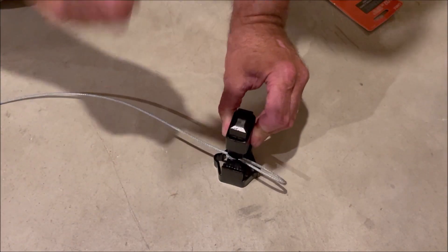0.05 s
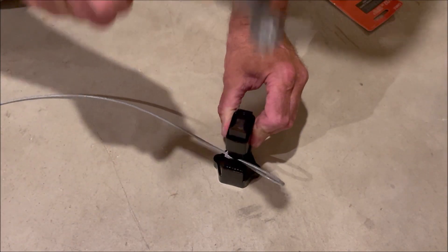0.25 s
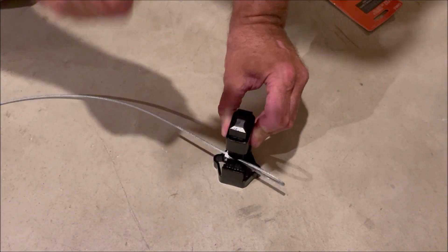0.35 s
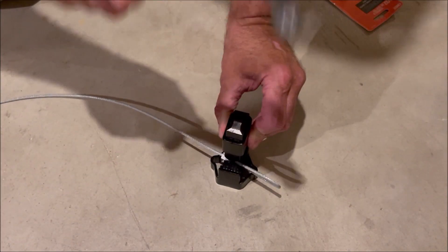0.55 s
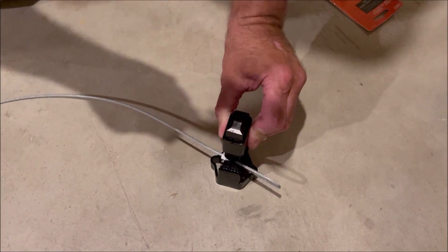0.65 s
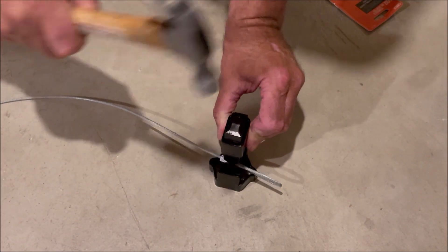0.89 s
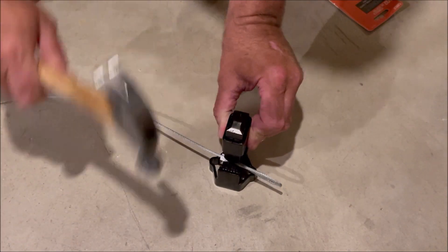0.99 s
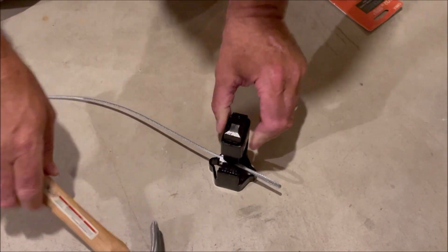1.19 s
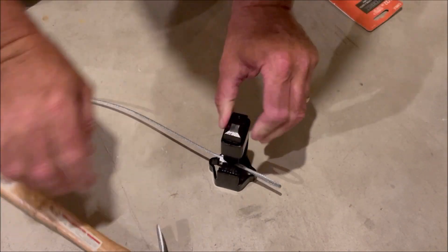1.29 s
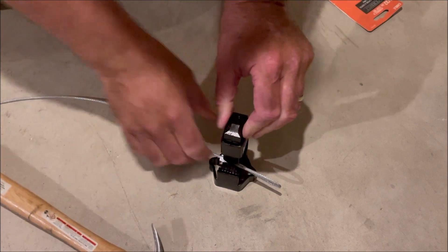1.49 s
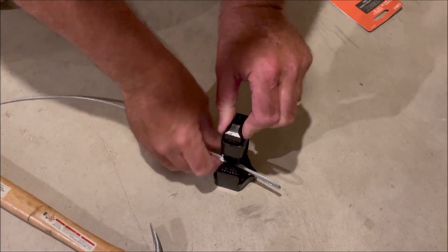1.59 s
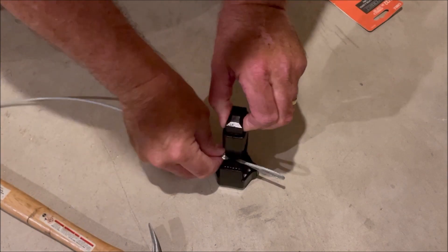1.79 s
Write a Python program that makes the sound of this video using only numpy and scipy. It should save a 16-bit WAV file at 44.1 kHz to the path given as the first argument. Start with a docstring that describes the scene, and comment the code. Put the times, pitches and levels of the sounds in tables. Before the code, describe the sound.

A steel hammer strikes a metal hand tool on concrete three times, then clatters down

```python
"""A bare room with a concrete floor: a steel hammer strikes a hand-held crimping tool three times, heard close.
Each blow is a noise crack, a short ring of tool modes and a sine thud that falls in pitch; the head sings on.
The hammer is then laid down: handle knocks and head clinks excite its modes as it rocks to rest.
Filtered noise gives the air, the rumble, the tail of an earlier blow and the room's reverb; a low hum swells between."""
import sys
import numpy as np
from scipy import signal
from scipy.fft import rfft, irfft, next_fast_len
from scipy.io import wavfile

SR = 44100
rng = np.random.default_rng(int(sys.argv[2]) if len(sys.argv) > 2 else 0)


def dump(signal):
    """Clip the signal to [-1, 1] and save it as 16-bit WAV at the path in sys.argv[1]."""
    limited = np.clip(np.atleast_2d(signal).T, -1, 1)
    pcm = np.round(limited * 32767).astype(np.int16)
    wavfile.write(sys.argv[1], SR, pcm)


N = 81585
T = np.arange(N) / SR


def from_db(db):
    """Decibels to gain."""
    return 10 ** (np.asarray(db) / 20)


def at_hz(points, hz):
    """Read a table on a log-frequency axis."""
    f, v = np.transpose(points)
    return np.interp(np.log(np.maximum(hz, 1)), np.log(f), v)


def add(out, s, x):
    """Mix x in from time s."""
    i = int(round(s * SR))
    x = x[max(-i, 0):N - i]
    out[max(i, 0):max(i, 0) + len(x)] += x


def colour(x, spectrum, tilt_db=0, keep_power=True):
    """Causal (minimum-phase) filter with the given spectrum, tilted about 3 kHz in dB per octave."""
    size = next_fast_len(N, True) * 2
    hz = np.maximum(np.fft.rfftfreq(size, 1 / SR), 1)
    octaves = np.log2(np.maximum(hz, 700) / 3000)  # the tilt levels off below 700 Hz
    gain = from_db(at_hz(spectrum, hz) + tilt_db * octaves)
    if keep_power:
        gain = gain / np.sqrt(np.mean(gain ** 2))
    # folding the cepstrum onto positive time gives minimum phase
    cepstrum = irfft(np.log(gain))[:size // 2]
    cepstrum[1:] *= 2
    return irfft(rfft(x, size) * np.exp(rfft(cepstrum, size)))[..., :N]


def dying(t60, hold=0):
    """Hold, then fall 60 dB in t60."""
    return from_db(-np.minimum(60 * np.maximum(T - hold, 0) / t60, 300))


def burst(length, t60):
    """A contact: dense random micro-impacts that hold briefly and die, evened out in spectrum."""
    size = 2048  # samples
    shape = dying(t60, length)[:size]
    x = rng.standard_normal(size) * shape
    for _ in range(2):
        flat = irfft(np.exp(1j * np.angle(rfft(x))))
        x = flat * np.sqrt(shape)
    energy_gain = np.sqrt(np.sum(shape ** 2) / np.sum(x ** 2))
    return np.pad(x * energy_gain, (0, N - size))


RING_FADE_IN_S = 0.00031  # short ramp that smooths the start of each ring


def ring(modes):
    """Struck modes (f/Hz, level/dB, t60/s) as dying sines of random sign."""
    out = np.zeros(N)
    for hz, db, t60 in modes:
        t = T[:int(2 * t60 * SR)]
        decay = from_db(db - 60 * t / t60)
        add(out, 0, rng.choice([-1, 1]) * decay * np.sin(2 * np.pi * hz * t))
    return out * np.minimum(T / RING_FADE_IN_S, 1)


THUD_START_HZ, THUD_END_HZ, THUD_RISE_S, THUD_T60_S = 507, 52, .0048, 0.066


def thud(fall_s):
    """The floor's answer: high notes arrive first, so the pitch falls."""
    hz = THUD_END_HZ + (THUD_START_HZ - THUD_END_HZ) * np.exp(-T / fall_s)
    rise = np.minimum(T / THUD_RISE_S, 1) ** 2
    return np.sin(2 * np.pi * np.cumsum(hz) / SR) * rise * dying(THUD_T60_S, THUD_RISE_S)


def stereo_noise(spread):
    """Two partly alike white noises: a shared mid, and a side of opposite sign in each channel."""
    mid, side = rng.standard_normal((2, N))
    return np.array([mid + spread * side, mid - spread * side]) / np.sqrt(1 + spread ** 2)


ROOM_SPREAD = 0.33  # side-to-mid ratio of the room's noise
AIR_DB, WASH_DB, WASH_T60_S = -69, -55, 0.69
# spectrum of the room's still air: f/Hz, relative level/dB
AIR_SPECTRUM = [(20, -41), (50, -9), (120, -0.5), (250, -4.5), (600, -10), (1300, -10.5), (3000, -21),
                (6000, -32.5), (9000, -43.5), (16000, -56)]
# rumble over time: t/s, level/dB
RUMBLE_LEVEL = [(0, -69.5), (.14, -49.5), (.28, -63.5), (.45, -55.5), (.65, -61), (1.0, -56.5), (1.15, -60),
                (1.3, -64), (1.55, -78), (1.85, -69)]
# spectrum of the rumble: f/Hz, relative level/dB
RUMBLE_SPECTRUM = [(15, -31), (45, -13), (70, 0.5), (90, -8), (125, -1.5), (200, -11), (320, -18),
                   (700, -25.5), (3000, -72.5)]
# spectrum of an earlier blow still dying in the room: f/Hz, relative level/dB
WASH_SPECTRUM = [(200, -21), (1000, -11), (2000, -8.5), (3000, 4.5), (4200, -13.5), (5700, 1.5),
                 (7000, -14.5), (11000, -14.5), (16000, -41.5)]


def background():
    """Noise beds: steady still air, a low rumble of changing level, and the dying tail of an earlier blow."""
    air = from_db(AIR_DB) * colour(stereo_noise(0.49), AIR_SPECTRUM)
    rumble_gain = from_db(np.interp(T, *np.transpose(RUMBLE_LEVEL)))
    rumble = rumble_gain * colour(stereo_noise(0.48), RUMBLE_SPECTRUM)
    wash = from_db(WASH_DB) * dying(WASH_T60_S) * colour(stereo_noise(ROOM_SPREAD), WASH_SPECTRUM)
    return air + rumble + wash


EARLIER_BLOW_S = -0.23  # before the start, so only its ring is heard
WAVER_DB, WAVER_HZ = 4.5, 22.7  # spread of the random level, and new levels per second
# modes of the hammer head after a blow: f/Hz, level/dB before the waver, t60/s
HEAD_MODES = [(1016, -69.5, 2.4), (1149, -62.5, 1.86), (1515, -65.5, 1.2), (2780, -71.5, 1.1),
              (3050, -69.5, 0.54), (5650, -63.5, .45), (9035, -42, 0.65)]


def head_ring():
    """The free hammer head rings faintly from each blow until its next contact, wavering as it is swung."""
    out = np.zeros(N)
    starts = [EARLIER_BLOW_S] + [row[0] for row in BLOWS]
    ends = starts[1:] + [TOUCHES[0][0]]
    for s, end in zip(starts, ends):
        add(out, s, ring(HEAD_MODES) * dying(0.0267, end - s))  # contact damps the ring
    sway = rng.standard_normal(size=128)
    return out * from_db(WAVER_DB * np.interp(T * WAVER_HZ, np.arange(len(sway)), sway))


HUM_HZ = 50
# swells of the hum: peak t/s, level/dB, half-width to 1/e t/s
HUM_SWELLS = [(0.118, -57, 0.045), (0.405, -43, 0.11), (0.69, -44, .07)]


def low_hum():
    """A soft low sine that swells and fades around the blows."""
    swell = sum(from_db(db) * np.exp(-((T - s) / width) ** 2) for s, db, width in HUM_SWELLS)
    return np.sin(2 * np.pi * HUM_HZ * T) * swell


CRACK_T60_S = 0.027
# spectrum of steel on steel and concrete: f/Hz, relative level/dB
CRACK_SPECTRUM = [(150, -0.5), (400, 1), (700, -2), (1100, 1), (1600, 3), (2200, -2.5), (3000, 2.5),
                  (4400, -2), (5800, 1.5), (6900, -1.5), (8200, -4), (9400, 1.5), (11500, -12.5),
                  (14200, -9.5), (15500, -12.5), (16500, -11.5)]


def crack(length, tilt_db):
    """Hard contact noise: a burst of micro-impacts in the colour of steel and concrete."""
    return colour(burst(length, CRACK_T60_S), CRACK_SPECTRUM, tilt_db)


FAINT_BURST_RISE_S = 0.002
# faint bursts just before the first and third blows: t/s, level/dB, hold t/s, brightness/dB per octave
FAINT_BURSTS = [(0.198, -44.5, .012, -4.5), (0.2102, -27.5, .007, -1.5), (0.8235, -34.5, .005, 0.5),
                (0.831, -34, .007, -5.5)]


def faint_bursts():
    """Faint noise bursts just before the first and third blows: crack noise with a softened attack."""
    out = np.zeros(N)
    for s, db, length, tilt_db in FAINT_BURSTS:
        add(out, s, from_db(db) * np.minimum(T / FAINT_BURST_RISE_S, 1) * crack(length, tilt_db))
    return out


def favour(x, hz, boost_db):
    """Lift one resonance, 89 Hz wide."""
    b, a = signal.iirpeak(hz, hz / 89, fs=SR)
    return x + (from_db(boost_db) - 1) * signal.lfilter(b, a, x)


TOOL_DETUNE = 0.0037  # typical random shift of a mode, as a fraction of its frequency
# modes of the crimping tool: f/Hz, level/dB relative to the blow's tool ring, t60/s
TOOL_MODES = [(1062, -3.5, .03), (1476, -5, 0.063), (2698, -3, 0.12), (2880, -2, 0.12), (2934, -2, 0.046),
              (4150, 0.5, 0.073), (4420, -2.5, 0.023), (5000, -0.5, 0.11), (5770, -9.5, 0.33),
              (5585, 6.5, 0.049), (5756, -9, 0.029), (7690, 13.5, 0.032), (9700, -2.5, 0.05),
              (10750, 1, .04)]
# blows: t/s, crack level/dB before the boost, contact length t/s, brightness/dB per octave, thud level/dB,
# thud delay t/s, thud pitch-fall time constant t/s, favoured resonance f/Hz, boost level/dB,
# tool ring level/dB
BLOWS = [(0.2197, -13.5, 0.0012, 1, -7.5, 0.00025, 0.0047, 2890, 9, -34.5),
         (0.5282, -15, 0.0034, 1, -15.5, 0.0029, .0034, 5570, 12, -29),
         (0.8398, -13.5, 0.0027, -0.5, -16.5, 0.00026, 0.0052, 10600, 16, -31)]


def blows():
    """Each blow cracks with one resonance favoured, rings the tool (seated a little differently) and thuds."""
    out = np.zeros(N)
    for s, db, length, tilt_db, thud_db, delay, fall_s, favoured_hz, boost_db, ring_db in BLOWS:
        modes = [(hz * (1 + TOOL_DETUNE * rng.standard_normal()), ring_db + level, t60)
                 for hz, level, t60 in TOOL_MODES]
        hit = favour(crack(length, tilt_db), favoured_hz, boost_db)
        add(out, s, from_db(db) * hit + ring(modes))
        add(out, s + delay, from_db(thud_db) * thud(fall_s))
    return out


ROOM_ONSET_S = 0.022
# spectrum of the reverb tail: f/Hz, level/dB
ROOM_SPECTRUM = [(60, -30.5), (200, -30.5), (600, -21), (1500, -19), (3000, -12), (5500, -16.5),
                 (7500, -25), (10500, -13.5), (16000, -5.5)]
# decay of the reverb tail: f/Hz, t60/s
ROOM_T60 = [(100, 0.15), (1000, 0.31), (3000, 0.25), (6000, 0.31), (10000, 0.22), (16000, 0.13)]
# distinct early echoes: delay t/s, level/dB before the low cut
ECHOES = [(.0152, -15), (.0205, -17)]


def room(x):
    """Low-cut early echoes, and a diffuse noise tail whose decay time depends on frequency."""
    hz, white = np.fft.rfftfreq(N, 1 / SR), rfft(stereo_noise(ROOM_SPREAD))
    edges = [0, 300, 1000, 2000, 4000, 6800, 9000, 11500, 13500, 23000]  # Hz
    tail = np.zeros((2, N))
    for lo, hi in zip(edges, edges[1:]):
        band = irfft(white * ((hz >= lo) & (hz < hi)), N)
        tail += band * dying(at_hz(ROOM_T60, (lo + hi) / 2))
    tail = tail * np.minimum(T / ROOM_ONSET_S, 1) ** 2
    tail = colour(tail / np.sqrt(np.sum(tail ** 2) / 2), ROOM_SPECTRUM, keep_power=False)
    early = np.zeros(N)
    for s, db in ECHOES:
        add(early, s, from_db(db) * x)
    early = signal.sosfilt(signal.butter(2, 500, "high", fs=SR, output="sos"), early)
    return early + signal.fftconvolve(x[None], tail, axes=1)[:, :N]


# trims of the contact noises, their decays, and how long a contact holds
KNOCK_DB, KNOCK_T60_S, CLINK_DB, CLINK_T60_S, TOUCH_LENGTH_S = -13, 0.036, -9.5, 0.014, 0.0014
TOUCH_FALL_S = 0.006  # time constant of the floor thud's pitch fall
# hammer meets the floor: t/s, then drive level/dB of wooden knock, steel clink and floor thud
TOUCHES = [(1.285, -32, -73, -39.5), (1.3143, -10, -33, -41.5), (1.353, -26, -41.5, -79),
           (1.3781, -37.5, -58, -50), (1.3985, -15.5, -28, -70), (1.415, -39, -37, -73),
           (1.4273, -46, -5.5, -39), (1.4597, -28, -54, -71), (1.5815, -27, -7, -54),
           (1.6041, -29, -51.5, -73.5), (1.6903, -25, -20, -71), (1.7645, -27.5, -20.5, -62.5),
           (1.8181, -32, -35, -68)]
# modes of the hammer: f/Hz, level/dB relative to a knock, level/dB relative to a clink, t60/s
HAMMER_MODES = [(537, -38, -50, 0.12), (586.8, -35, -50, 0.17), (1214, -19, -57, 0.02),
                (1485, -12.5, -42, 0.034), (1574, -24.5, -40.5, 0.12), (2010, -27, -41.5, 0.059),
                (2607, -8, -28, 0.035), (3151, -21, -13.5, 0.054), (3590, -20.5, -14.5, 0.015),
                (4337, -15.5, -4, 0.029), (4600, -37.5, -12.5, 0.023), (5750, -18, -16, 0.048),
                (6523, -37.5, -3, 0.025), (8700, -49, -19, 0.022), (9093, -58, -31.5, .24)]
# contact spectrum of the wooden handle: f/Hz, relative level/dB
KNOCK_SPECTRUM = [(40, -41.5), (150, -20), (500, -18.5), (1200, 0.5), (2500, 14), (4000, 4), (5800, -0.5),
                  (7000, -20), (9500, -8.5), (12000, -38), (16000, -60.5)]
# contact spectrum of steel on concrete: f/Hz, relative level/dB
CLINK_SPECTRUM = [(30, -41), (110, -37.5), (400, -26), (1000, -31), (2200, -7), (3400, -1.5), (4800, 7),
                  (6800, -5), (8500, -6.5), (9700, -29.5), (12000, -49.5), (16000, -42.5)]


def hammer_laid_down():
    """Every touch is part wooden knock, part steel clink, into the same modes, with a small floor thud."""
    rings, knocks, clinks = np.zeros((3, N))
    bump = thud(TOUCH_FALL_S) * dying(0.07)
    for s, knock_db, clink_db, thud_db in TOUCHES:
        # the stronger of knock and clink sets each mode's level
        modes = [(hz, max(knock_db + wood, clink_db + steel), t60) for hz, wood, steel, t60 in HAMMER_MODES]
        add(rings, s, ring(modes) + from_db(thud_db) * bump)
        add(knocks, s, from_db(knock_db + KNOCK_DB) * burst(TOUCH_LENGTH_S, KNOCK_T60_S))
        add(clinks, s, from_db(clink_db + CLINK_DB) * burst(TOUCH_LENGTH_S, CLINK_T60_S))
    return rings + colour(knocks, KNOCK_SPECTRUM) + colour(clinks, CLINK_SPECTRUM)


HANDLING_ROOM_DB = -3.5  # reverb send of the laying down, relative to the blows


def scene():
    """Blows and handling in the room, over head ring, hum and background."""
    struck, handled = faint_bursts() + blows(), hammer_laid_down()
    reverb = room(struck + from_db(HANDLING_ROOM_DB) * handled)
    return struck + handled + reverb + head_ring() + low_hum() + background()


CEILING, CUTOFF_HZ = .9, 17000
# phase by which the left microphone port leads the right: f/Hz, phase/rad
PORT_PHASE = [(50, -0.25), (250, 0.39), (600, 0.67), (1300, .5), (2900, 0.5), (4500, -0.1), (6200, -1.5),
              (7000, -3.0), (7900, -3), (9200, -2), (10500, -1), (12300, -0.17), (13600, 4), (15500, 3.5)]


def record(dry):
    """The two close ports differ in phase, the highest peaks are clipped, the top is cut."""
    size = next_fast_len(N, True) * 2
    lead = at_hz(PORT_PHASE, np.fft.rfftfreq(size, 1 / SR))
    turn = np.exp(.5j * np.array([lead, -lead]))  # half the lead to each side
    heard = irfft(rfft(dry, size) * turn)[:, :N]
    clipped = np.clip(heard, -CEILING, CEILING)
    return signal.sosfilt(signal.cheby2(16, 70, CUTOFF_HZ, fs=SR, output="sos"), clipped)


dry = scene()
out = record(dry)
dump(out)
```